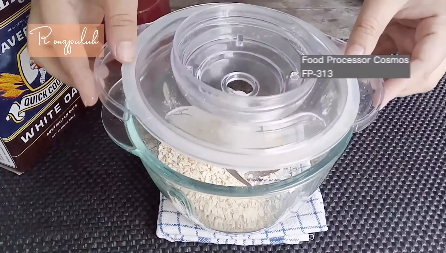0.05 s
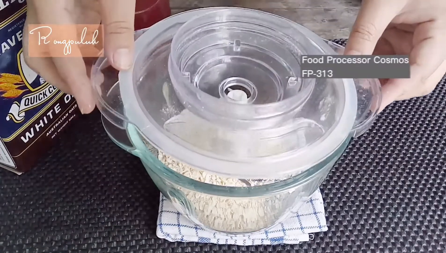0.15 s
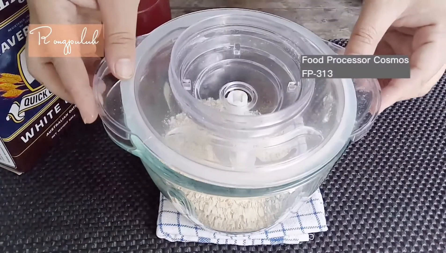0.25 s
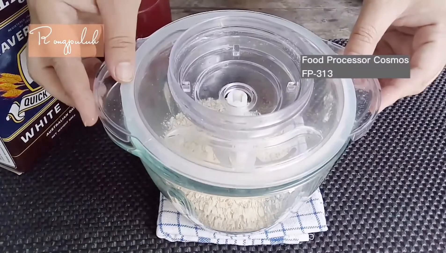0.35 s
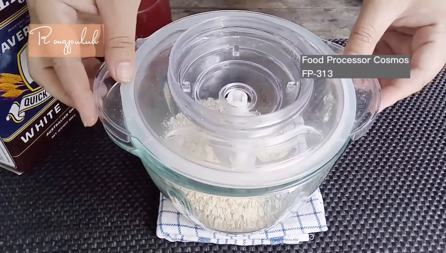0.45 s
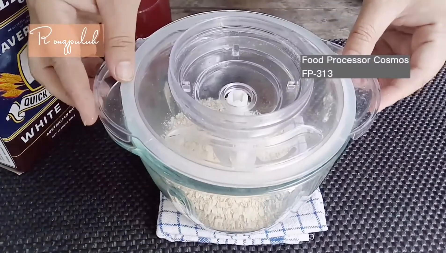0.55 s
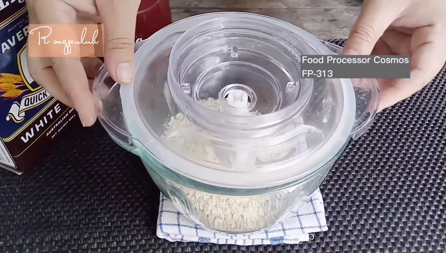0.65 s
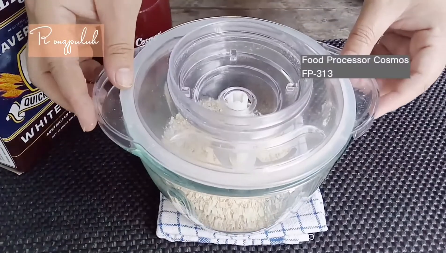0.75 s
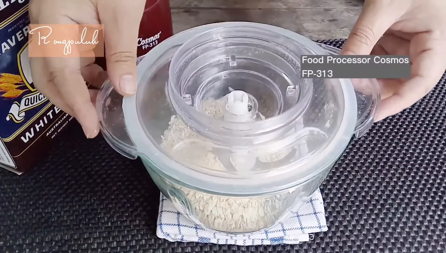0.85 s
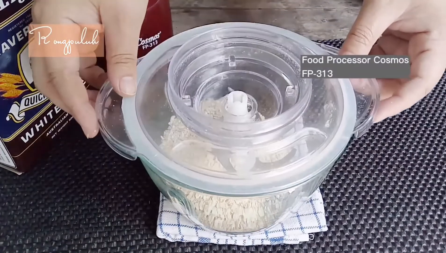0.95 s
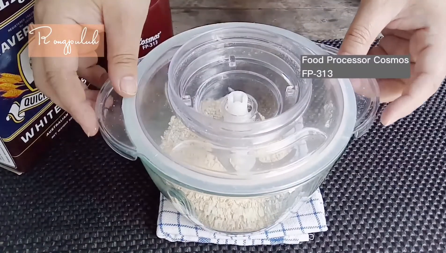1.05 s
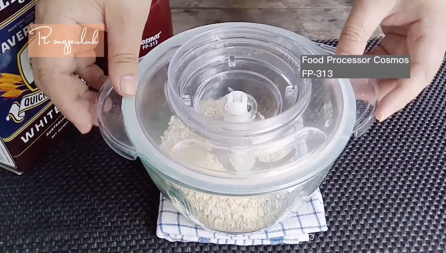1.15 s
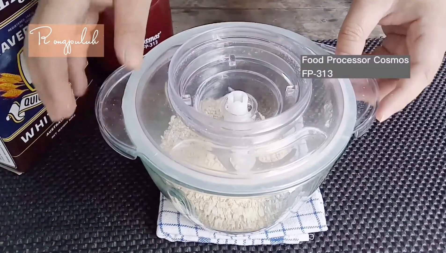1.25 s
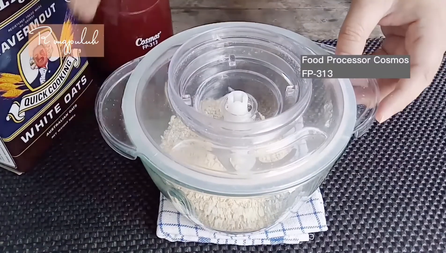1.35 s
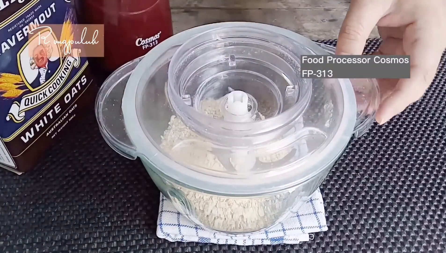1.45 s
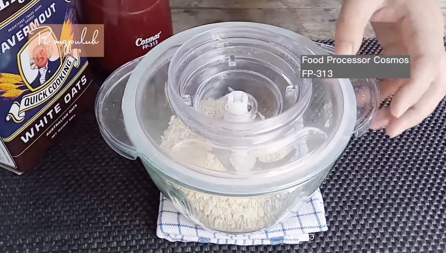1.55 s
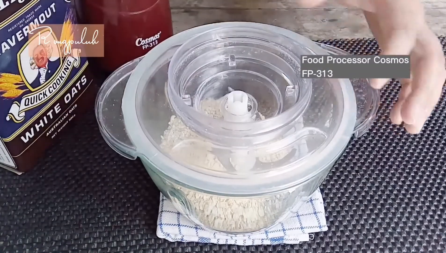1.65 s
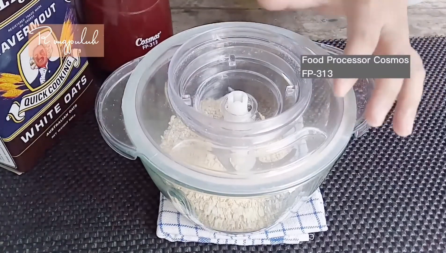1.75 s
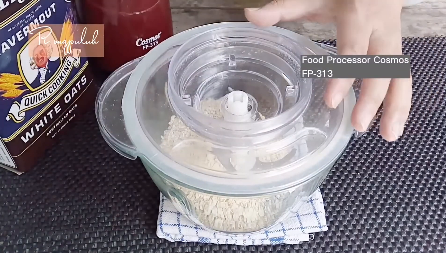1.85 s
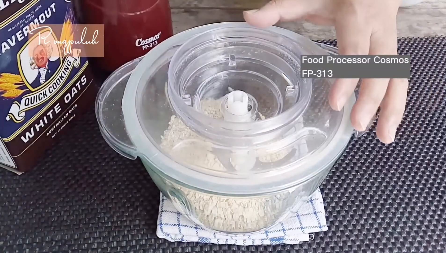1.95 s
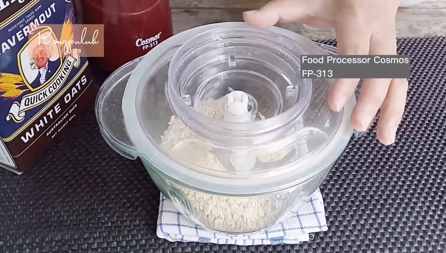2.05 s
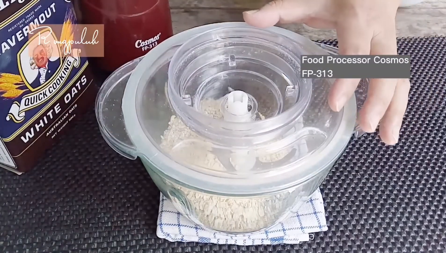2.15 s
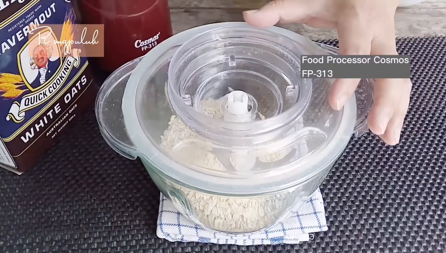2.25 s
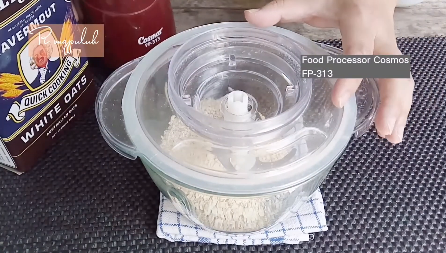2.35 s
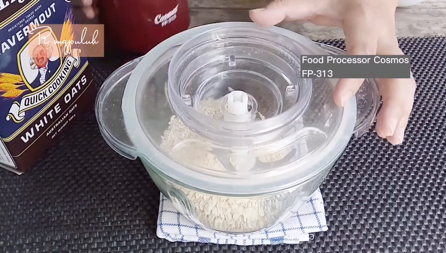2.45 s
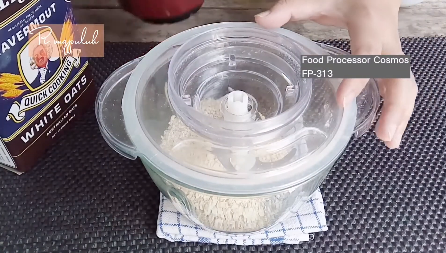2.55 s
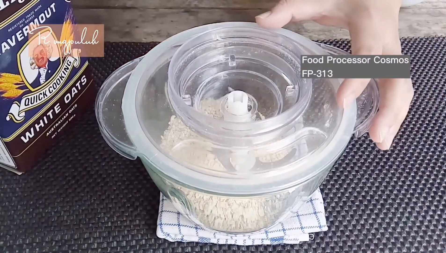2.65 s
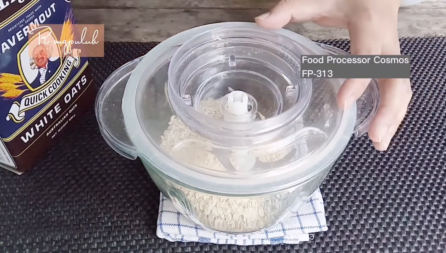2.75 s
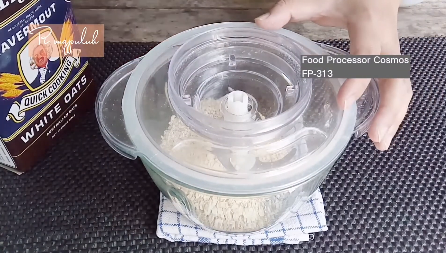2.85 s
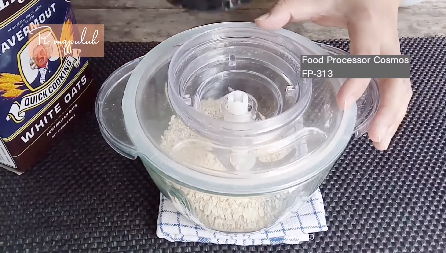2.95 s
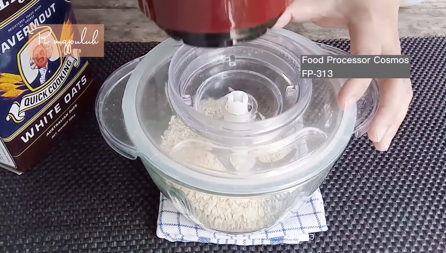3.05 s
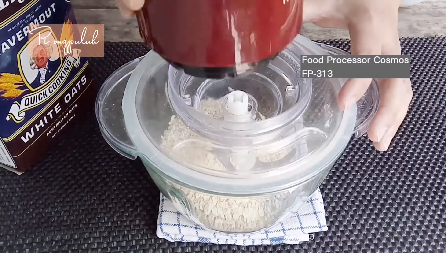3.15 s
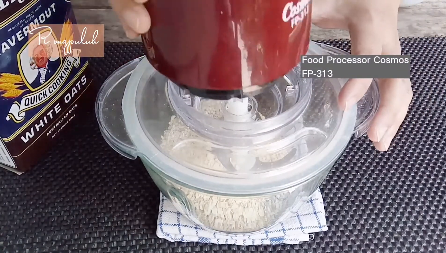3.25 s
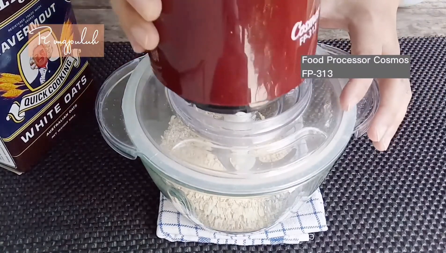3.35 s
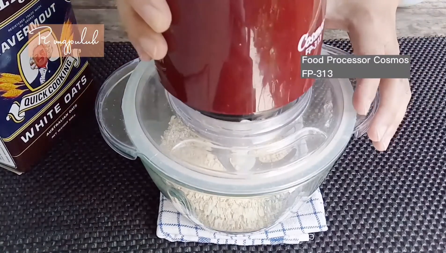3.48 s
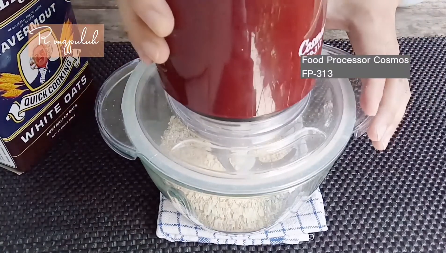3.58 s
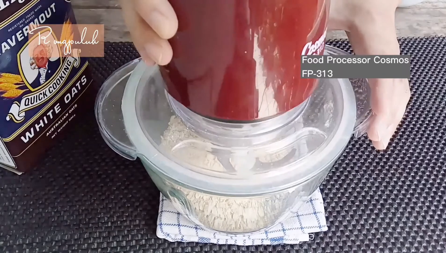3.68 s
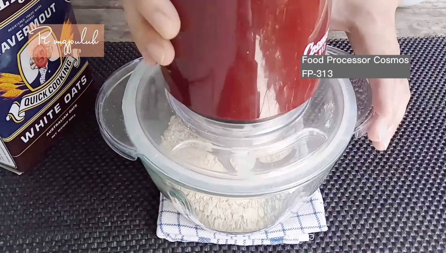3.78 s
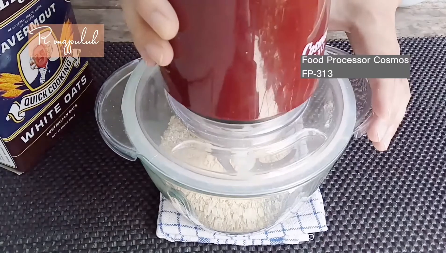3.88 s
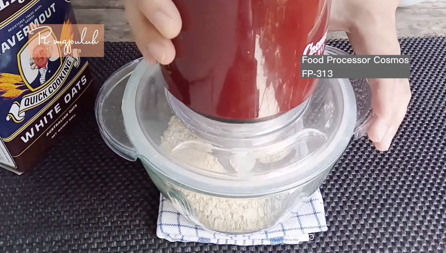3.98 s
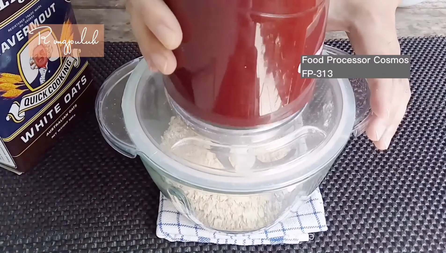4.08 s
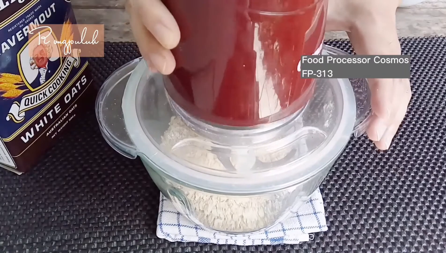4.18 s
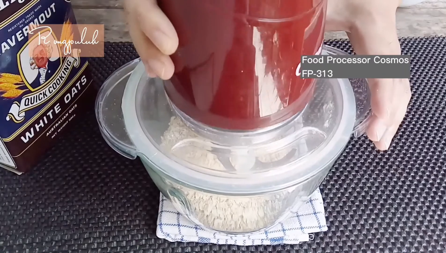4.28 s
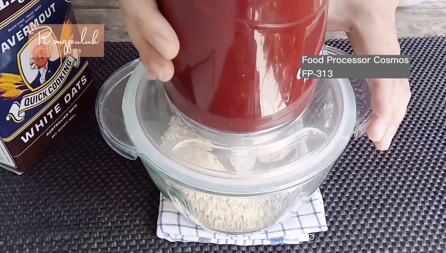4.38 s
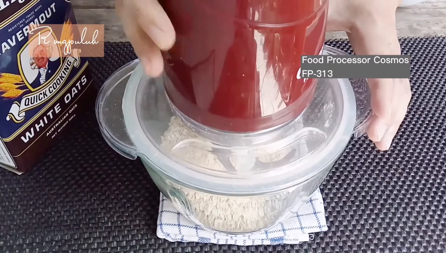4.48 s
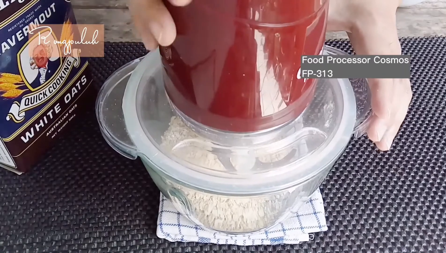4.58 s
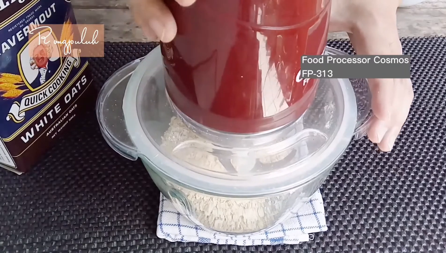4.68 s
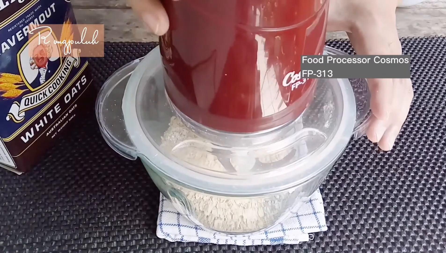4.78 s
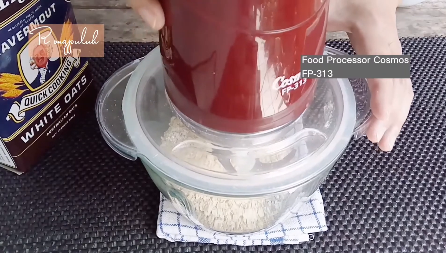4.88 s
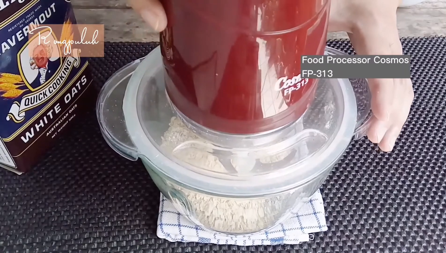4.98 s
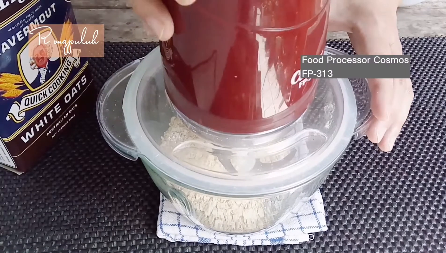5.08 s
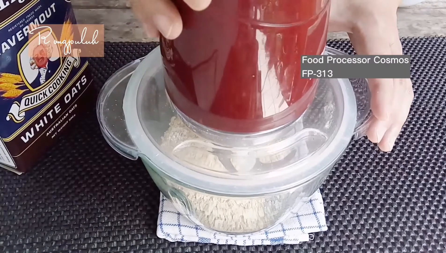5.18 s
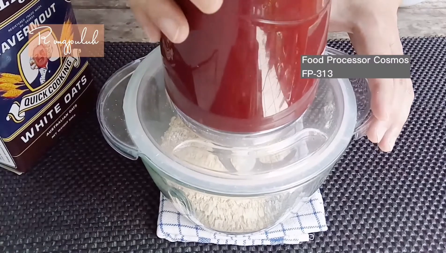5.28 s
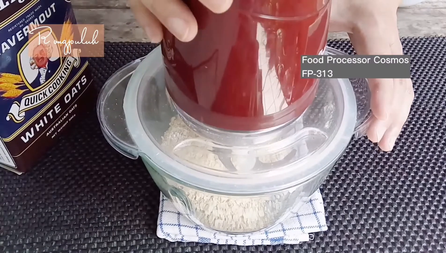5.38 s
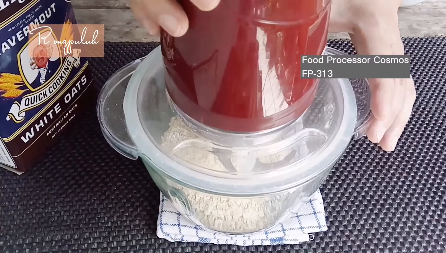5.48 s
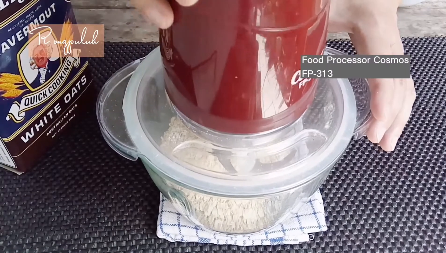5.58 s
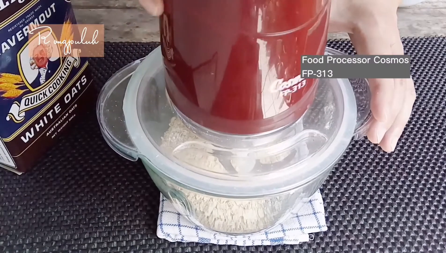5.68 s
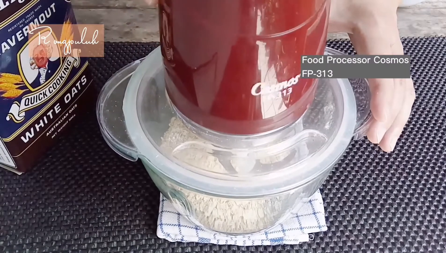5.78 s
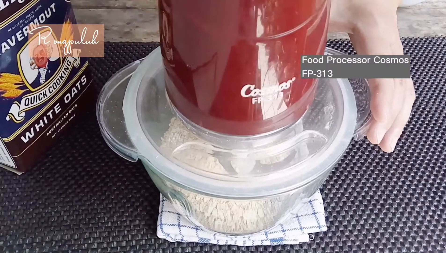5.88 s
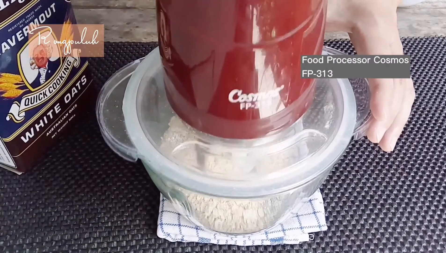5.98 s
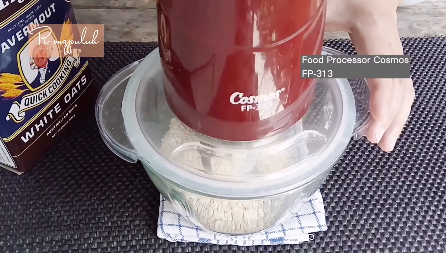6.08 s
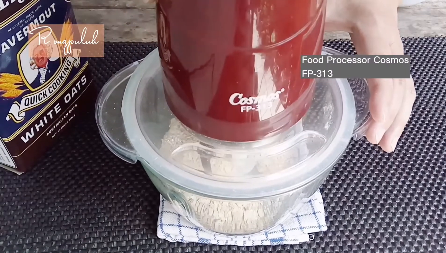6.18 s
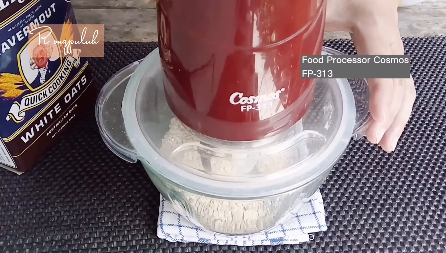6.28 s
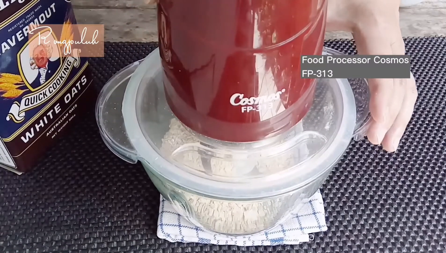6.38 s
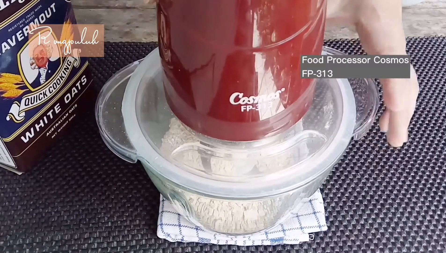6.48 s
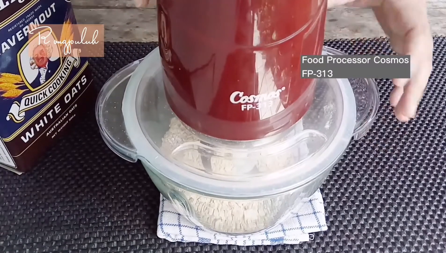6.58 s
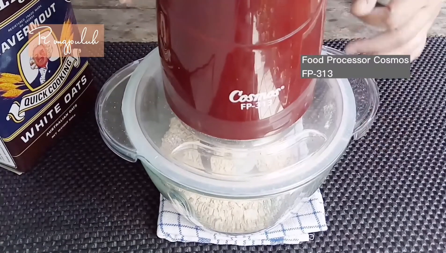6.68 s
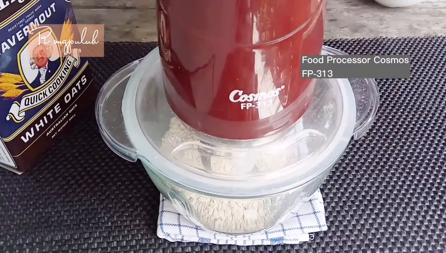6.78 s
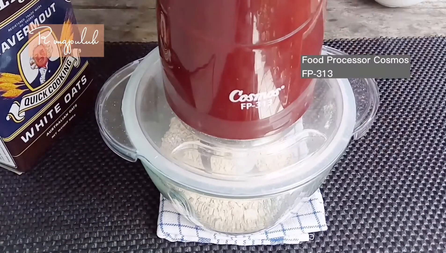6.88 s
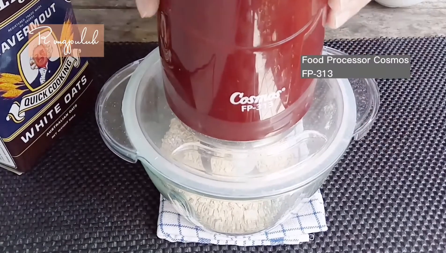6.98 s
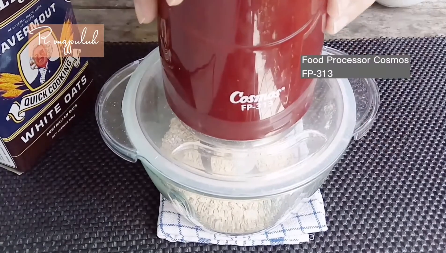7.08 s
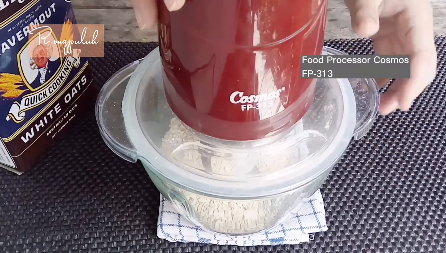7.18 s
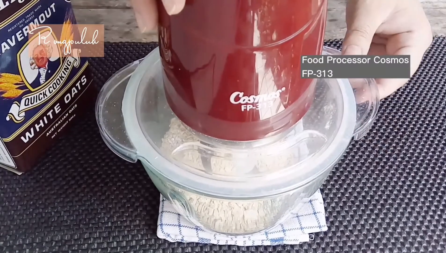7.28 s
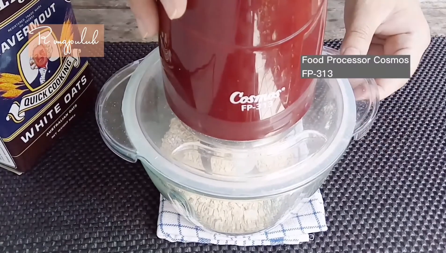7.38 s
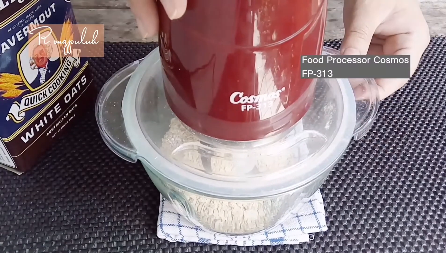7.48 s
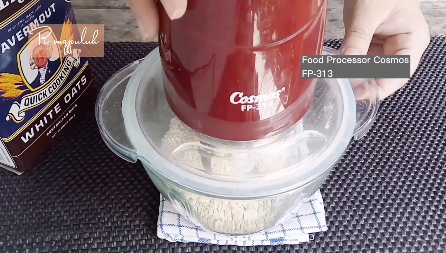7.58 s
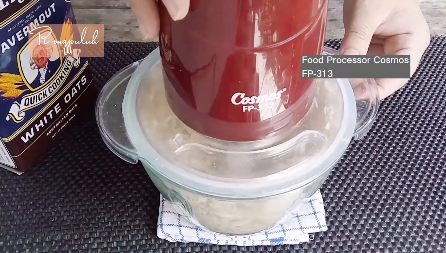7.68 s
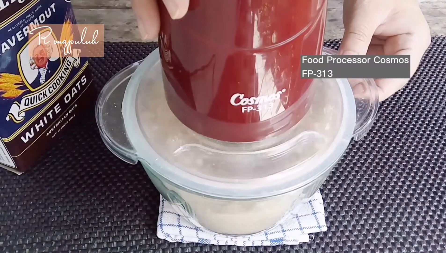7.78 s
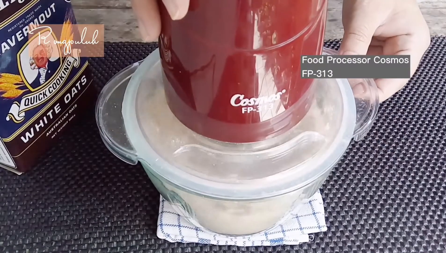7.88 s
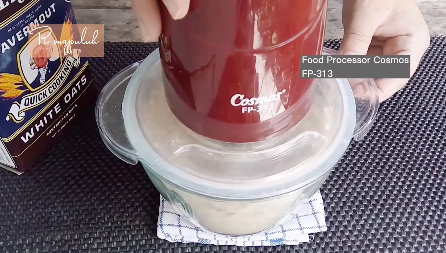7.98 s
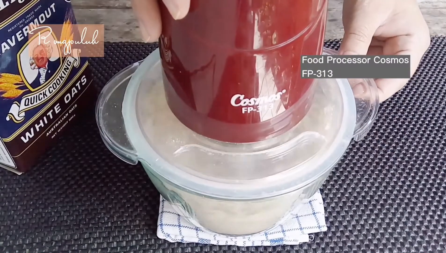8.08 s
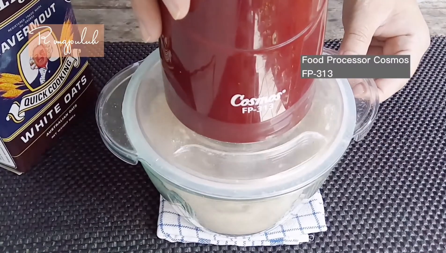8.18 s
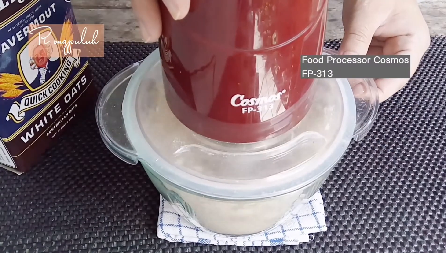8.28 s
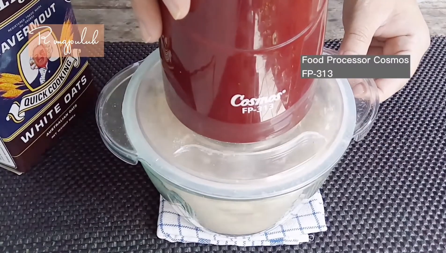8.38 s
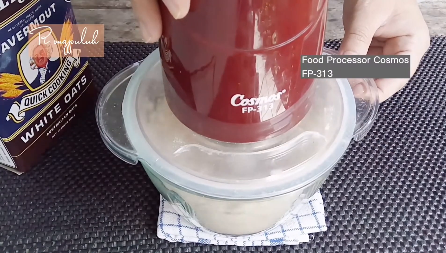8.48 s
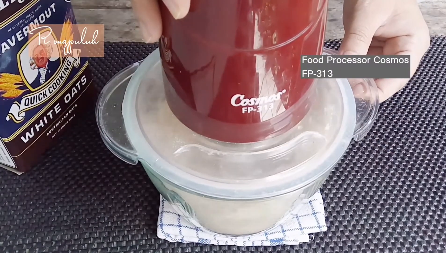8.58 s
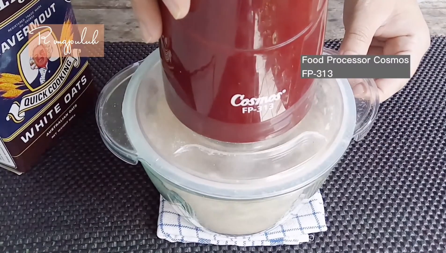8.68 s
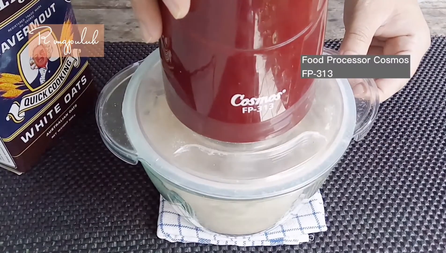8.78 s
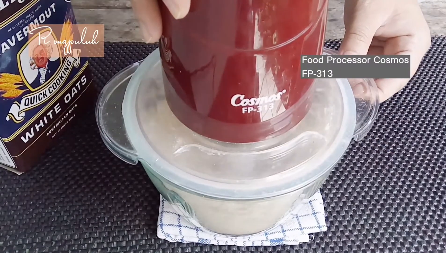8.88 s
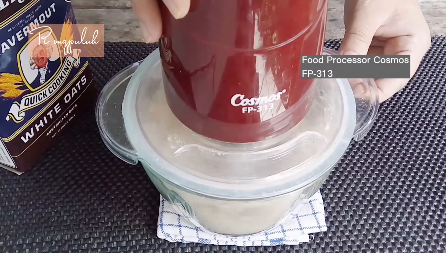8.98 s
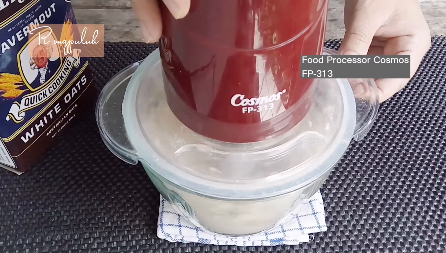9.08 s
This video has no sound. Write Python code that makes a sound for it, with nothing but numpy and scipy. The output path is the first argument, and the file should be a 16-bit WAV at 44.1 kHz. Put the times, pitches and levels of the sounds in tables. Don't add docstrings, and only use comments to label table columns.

```python
import sys
import numpy as np
from scipy import signal
from scipy.fft import rfft, irfft
from scipy.io import wavfile

SR = 44100
rng = np.random.default_rng(int(sys.argv[2]) if len(sys.argv) > 2 else 0)


def volts_from_db(level):
    exponent = np.asarray(level, float) / 20
    return 10 ** exponent


def wav_out(sig):
    wavfile.write(sys.argv[1], SR, np.round(np.clip(np.atleast_2d(sig).T, -1, 1) * 32767).astype(np.int16))


N = 403074
T = np.arange(N) / SR
HZ = np.maximum(np.fft.rfftfreq(N, 1 / SR), 1)
SIDES = np.array([[.5], [-.5]])
SCENE_ENDS_S, NEXT_SCENE_S = 6.834, 6.893
SWITCH_S, START_S = 7.8, 7.82
BODY_HZ = 198.3


def over_hz(table):
    hz, value = np.transpose(table)
    return np.interp(np.log(HZ), np.log(hz), value)


def over_time(table, fade=0.0041):
    s, *columns = np.transpose(table)
    gate = np.clip(np.minimum(T - s[0], s[-1] + fade - T) / fade, 0, 1)
    return [np.interp(T, s, c) for c in columns] + [gate]


def since(s):
    return np.maximum(T - s, 0), T >= s


def bursts(rows, rest_db, rise_s):
    power = volts_from_db(2 * rest_db) + 0 * T
    for s, db, fade in rows:
        after, on = since(s - rise_s)
        rise = np.minimum(after / rise_s, 1)
        power = power + on * volts_from_db(2 * db) * rise * np.exp(-2 * np.maximum(after - rise_s, 0) / fade)
    return 10 * np.log10(power)


def colour(x, gain, lo_hz, hi_hz):
    band = (HZ > lo_hz) & (HZ < hi_hz)
    return irfft(rfft(x) * gain / np.sqrt(np.sum(gain[..., band] ** 2) / gain.size), N)


def hump_noise(hz, width, lo_hz, hi_hz):
    gain = np.exp(-(np.log(HZ / hz) / width) ** 2)
    return colour(rng.standard_normal((2, N)), gain, lo_hz, hi_hz)


def walk(rate, channels=1):
    x = irfft(rfft(rng.standard_normal((channels, N))) * np.exp(-(HZ / rate) ** 2), N)
    return x / x.std()


def pair(alike):
    mid, side = rfft(rng.standard_normal((2, N)))
    alike = np.clip(alike, 0, 1)
    return irfft(np.sqrt((1 + alike) / 2) * mid + np.sqrt((1 - alike) / 2) * side * 2 * SIDES, N)


def ring(t, hz, t60):
    return np.sin(2 * np.pi * hz * t) * np.exp(-np.log(1000) * t / t60)


def whine(hz, db, width_hz, rough, lag=0.):
    turn = np.exp(2j * np.pi * np.cumsum(hz) / SR + 1j * lag * SIDES)
    rough = np.clip(rough, 0, 1)
    wander = (walk(width_hz, channels=2) + 1j * walk(width_hz, channels=2)) * np.sqrt(rough / 2)
    return np.sqrt(2) * volts_from_db(db) * np.real(turn * (np.sqrt(1 - rough) + wander))


# (frequency [Hz], likeness [-1 to 1])
AIR_ALIKE = [(60, 0.98), (130, 1), (290, 0.64), (640, 0.25), (1410, -0.23), (3100, 0), (6820, 0.14),
             (15000, 0.0)]
# (frequency [Hz], left minus right [dB])
AIR_PAN = [(60, 15), (110, -1), (200, 4.5), (380, 0), (700, -0.5), (1290, 0.5), (2380, 1.5), (4400, 2),
           (8120, 5), (15000, -4)]


def hum_and_hiss(spectrum, low_db, high_db, flicker_db):
    gain = volts_from_db(over_hz(spectrum) + over_hz(AIR_PAN) * SIDES)
    noise = pair(over_hz(AIR_ALIKE))
    bass = 1 / (1 + (HZ / 500) ** 2)
    low = colour(noise, gain * bass, 80, 410) * volts_from_db(low_db + flicker_db * walk(8.1))
    high = colour(noise, gain * (1 - bass), 1030, 18000)
    return low + high * volts_from_db(high_db + 0.25 * flicker_db * walk(33))


# (frequency [Hz], density [dB per Hz])
AIR = [(15, -45), (25, 4), (49, -15.5), (113, -4), (160, -2.5), (198, -12), (331, -17), (445, -21),
       (537, -19), (1300, -29), (1800, -29.5), (2700, -32), (10100, -36), (13900, -46), (15500, -76)]
# (time [s], level over the still room [dB])
STIR = [
    (0, 0),
    (.4, 2),
    (1.0, -1),
    (2.0, 0.5),
    (4.1, 1.5),
    (4.45, 2.5),
    (5.9, 4),
    (6.3, 4.5),
    (6.45, 0.5),
    (6.84, 3),
]


def kitchen():
    stir_db, _ = over_time(STIR)
    booms = []
    for s, _, boom_db, *_ in HEAD:
        booms += [(s, boom_db - 20, 0.04), (s, boom_db - 41, 0.68)]
    low_db = bursts(booms, -47.5 + 0.41 * stir_db, rise_s=0.021)
    high_db = -55.5 + stir_db
    return hum_and_hiss(AIR, low_db - 0.5, high_db + 3, 3.24) * (T < NEXT_SCENE_S)


# (frequency [Hz], level [dB], t60 [s])
TABLE_TOP = [(91.5, -26, 0.18), (125.5, -6, 0.35), (175, 16, 0.13), (314, -39, 2.9)]


def table_boom(t):
    push = np.hanning(int(0.008 * SR))
    modes = sum(volts_from_db(db) * ring(t, hz, t60) for hz, db, t60 in TABLE_TOP)
    boom = np.convolve(modes, push)[:len(t)]
    return -boom / np.abs(boom).max()


# (frequency [Hz], density [dB per Hz])
CRACK = [(710, -29), (1200, 1.5), (2380, -11), (3140, -3), (3810, -6.5), (5490, -6), (8420, -7),
         (10100, -11), (15500, -28)]


def strike(rows, modes):
    out, t = np.zeros((2, N + SR)), np.arange(SR // 2) / SR
    snap = colour(rng.standard_normal((2, N)), volts_from_db(over_hz(CRACK)), 1130, 12000)
    rattle = hump_noise(550, 0.67, 200, 1800)
    clack = hump_noise(2800, 0.88, 1500, 6000)
    spot = rng.standard_normal((len(rows), len(modes), 2))
    boom = table_boom(t)
    for (s, crack_db, boom_db, body_db, body_hz, ring_db), chance in zip(rows, spot):
        i = int(s * SR)
        piece = slice(i // 2, i // 2 + len(t))
        tail = (1 - np.exp(-t / 0.00017)) * (np.exp(-t / 0.0025) + volts_from_db(-16.5) * np.exp(-t / 0.014))
        crack = volts_from_db(crack_db - 6.5) * tail * snap[:, piece]
        rim = volts_from_db(-9.5) * np.exp(-t / 0.0071) * clack[:, piece]
        for (hz, db, t60), (louder, higher) in zip(modes, chance):
            rim = rim + volts_from_db(db + 1.6 * louder) * ring(t, hz * (1 + 0.035 * higher), t60)
        body = ring(t, body_hz, 0.063) + volts_from_db(-11.0) * ring(t, 424.0, 0.038)
        body = body + volts_from_db(-16.5) * np.exp(-t / 0.011) * rattle[:, piece]
        body = body * (1 - np.exp(-t * body_hz / 0.31))
        near = crack + volts_from_db(body_db + 5.5) * body + volts_from_db(ring_db - 3.5) * rim
        out[:, i:i + len(t)] += near * volts_from_db(4.2 * SIDES) + volts_from_db(boom_db + 1 + 1.2 * SIDES) * boom
    return out[:, :N]


# (frequency [Hz], level [dB], t60 [s])
RIM = [(720, -6, 0.026), (1030, 1.5, 0.017), (1525, 2, .03), (2230, -18, 0.03)]
# (time [s], crack peak [dB], body level [dB], body frequency [Hz], rim level [dB])
TAPS = [(0.3037, -49, -41, 525, -27), (0.3326, -28, -43, 430, -33), (0.35, -29, -33, 510, -36),
        (0.3546, -35, -28, 524, -37), (0.3972, -31, -33, 490, -36), (0.5238, -14.5, -33, 400, -30),
        (0.5552, -41, -37, 259, -52), (0.902, -52, -34, 364, -57), (1.0757, -38, -30.5, 228, -47),
        (1.0834, -51, -30, 188, -55), (1.4276, -30.5, -50, 247, -33.5), (1.0745, -60, -43.5, 1024, -60)]


def lid_taps():
    rows = []
    for s, crack_db, body_db, hz, rim_db in TAPS:
        boom_db = body_db + 7.5 - 9.5 * np.log2(hz / BODY_HZ)
        rows.append((s, crack_db, boom_db, body_db, hz, rim_db))
    return strike(rows, RIM)


# (time [s], peak level [dB], frequency [Hz], relative width [log ratio], length [s])
SCUFFS = [
    (1.36, -51.5, 4170, 0.26, 0.086),
    (1.358, -44.5, 2470, 0.067, 0.028),
    (3.527, -49.5, 3900, 0.25, 0.11),
    (3.54, -46.5, 2500, 0.13, 0.044),
    (4.676, -47.5, 8400, 0.6, 0.03),
    (5.58, -51.5, 440, 0.39, 0.51),
    (5.81, -52.5, 5600, 0.48, 0.27),
    (6.64, -47, 5190, 0.073, 0.1),
    (6.72, -54, 5150, 0.04, 0.15),
    (3.45, -60, 3800, 0.25, 0.087),
]


def scuffs():
    out = 0
    for s, db, hz, width, length in SCUFFS:
        swell = np.exp(-(2 * (T - s) / length) ** 2)
        out = out + volts_from_db(db + 3.2 * walk(55)) * swell * hump_noise(hz, width, 100, 16000)
    return out * (T < NEXT_SCENE_S)


# (frequency [Hz], level [dB], t60 [s])
SEAT = [(914, -6, 0.02), (1160, -1, 0.034), (1650, -4.5, 0.017), (2530, -13, 0.028)]
# (time [s], crack peak [dB], table boom [dB], body level [dB], rim level [dB])
HEAD = [(2.791, -38, -27, -32, -41), (3.6547, -38, -24.5, -27, -58), (3.7581, -36.5, -22, -21.5, -37),
        (3.895, -51, -27, -21.5, -60), (3.9179, -34, -19, -24, -28.5), (4.2411, -28, -25, -29, -63),
        (4.2546, -25, -23, -22.5, -45), (4.2649, -25, -19.5, -30, -36), (4.2802, -20, -11, -31, -8.5),
        (4.2837, -7, -24, -5, -16.5), (4.296, -31, -15, -11, -42), (4.344, -29, -18, -28.5, -50),
        (4.5225, -42, -33, -23.5, -46), (4.5385, -25, -21, -25, -35), (5.2146, -30.5, -28.5, -32.5, -43),
        (5.8994, -41, -32, -55, -53), (6.1768, -15.5, -33, -26, -24), (6.1831, -9.5, -9, -14.5, -33),
        (6.1915, -20, -5.5, -12.5, -22), (6.2005, 0, -33, -32, -36), (6.2095, -4.5, -14, -21, -18),
        (6.2149, -3, -9, -10.5, -4.5), (6.2213, -17, -5, -9.5, -17)]


def motor_head():
    rows = [(s, crack, boom, body, BODY_HZ, rim) for s, crack, boom, body, rim in HEAD]
    return strike(rows, SEAT)


# (frequency [Hz], level [dB], t60 [s])
LIFT = [(213, 7.5, 1.76), (312, -6.5, 4.1), (363, 5.5, 0.72), (487, -3, .7), (600, -13, 2.7)]


def head_lift():
    after, _ = since(2.8)
    modes = sum(volts_from_db(db) * ring(after, hz, t60) for hz, db, t60 in LIFT)
    return volts_from_db(-44.5 + 2.2 * walk(22, channels=2)) * (1 - np.exp(-after / 0.0029)) * modes


# (frequency [Hz], density [dB per Hz])
RUSTLE = [(120, -19), (200, -2.5), (339, -17.5), (488, -9.5), (665, -21.5), (1350, -26.5), (2330, -26.5),
          (2750, -26.5), (6350, -31), (8200, -28), (11200, -30), (15500, -35.5)]
# (time [s], level [dB])
PRESS = [(6.89, -36), (6.96, -33), (7.0, -38), (7.12, -31), (7.165, -46), (7.19, -32), (7.25, -36.5),
         (7.38, -32), (7.458, -44), (7.494, -32.5), (7.73, -32.5), (7.8, -36.5), (7.86, -38)]
# (time [s], rustle level [dB], table boom [dB], fade [s])
SLIPS = [(6.946, -42.5, -31, 0.029), (7.049, -50.5, -27, .025), (7.1196, -52, -26, 0.017),
         (7.1843, -46, -38, 0.069), (7.3, -48.5, -44, .015), (7.344, -46, -34, 0.096),
         (7.484, -47.5, -42, .05), (7.5242, -50, -31, 0.027), (7.5542, -47, -36, .015),
         (7.597, -44, -27, 0.095), (7.6954, -48, -31, 0.021), (7.732, -46.5, -23, 0.14),
         (7.806, -40.5, -44, .04)]


def fingers():
    low_db, gate = over_time(PRESS)
    high_db = bursts([(s, db, fade) for s, db, _, fade in SLIPS], rest_db=-54.5, rise_s=0.0069)
    rocking = whine(142 + 9 * walk(6.0)[0], low_db + 1.5 * SIDES, 25, 0.16)
    skin = hump_noise(11000, 0.37, 1500, 16000) * volts_from_db(high_db - 14.0 + 5.0 * walk(21))
    rustle = hum_and_hiss(RUSTLE, low_db - 9.5, high_db + 4.5, 4.4)
    ticks = [(s, db - 5, boom_db, -40.5, BODY_HZ, db - 17) for s, db, boom_db, _ in SLIPS]
    return gate * (rocking + rustle + skin) + strike(ticks, SEAT)


def shaft_hum(hz):
    short_db = 0.36 * np.minimum(hz - 322, 0)
    hum = whine(hz, -23.5 + short_db + 5.7 * SIDES, 17, 0.013)
    return hum + whine(2 * hz, -38 + 0.18 * short_db - 1.8 * SIDES, 30, 0.26, lag=1.3)


def rumble(db):
    gain = sum(1 / (1 + (2 * (HZ - hz) / width) ** 2) for hz, width in ((135, 34), (180, 37)))
    return colour(pair(0.8 + 0 * HZ), gain, 90, 240) * volts_from_db(db)


def gear_whine(hz, run):
    mesh_hz = 8.7 * hz
    bite_db = 100 * np.log10(hz / 330)
    fine = 1 / (1 + np.exp(-(T - 8.24) / 0.039))
    mesh_db = -16 - 4.5 * fine - 5 * run
    mesh = whine(mesh_hz, mesh_db - 4.5 + bite_db + 2.8 * SIDES, 110, .4, lag=1.38)
    lower_hz = np.minimum(2.03 * mesh_hz, 5670)
    lower = whine(lower_hz, -22 - 5.5 + 0.79 * bite_db + 7.6 * SIDES, 200, 0.95)
    upper_hz = 6210 + 5.5 * (hz - 347)
    upper = whine(upper_hz, -19 - 3 + 4.5 * (run - 1) + 9.4 * SIDES, 190, 1)
    return mesh + (1 - 0.66 * fine) * lower + (0.27 * (T >= START_S) + 0.68 * fine) * upper


# (frequency [Hz], density [dB per Hz])
GRIND = [(150, -54), (250, -17), (450, -15.5), (600, -22), (880, -24), (1230, -19.5), (2270, -22),
         (3000, -14.5), (4600, -20), (6300, -15), (8200, -16), (10500, -22), (14300, -31.5), (14600, -68)]
# (frequency [Hz], left minus right [dB])
GRIND_PAN = [(60, -2), (110, 10), (200, 2), (380, 5.5), (700, -1.0), (1290, 4.5), (2380, 0), (4400, 7),
             (8120, 7.0), (15000, -2)]
# (frequency [Hz], width [Hz], level over grinding [dB])
BOWL = [(1215, 194, 6), (4980, 560, -4), (5420, 200, -8.5)]


def oats():
    biting, _ = since(START_S)
    db = -29.5 - 6 * np.exp(-biting / .12) + 1.5 * np.exp(-biting / 0.016)
    hits = rng.random((2, N)) < .08
    flakes = hits * volts_from_db(3.2 * rng.exponential(size=(2, N))) * rng.standard_normal((2, N))
    rush = pair(0.48 / (1 + (HZ / 500) ** 2)) + .5 * flakes / flakes.std()
    body = 1 + sum(volts_from_db(top_db) / (1 + (2 * (HZ - hz) / width) ** 2) for hz, width, top_db in BOWL)
    gain = volts_from_db(over_hz(GRIND)) * body * volts_from_db(over_hz(GRIND_PAN) * SIDES)
    rattling = colour(rush / rush.std(), gain, 840, 2350) * volts_from_db(db + 4.0 + 0.69 * walk(48))
    return np.clip((T - START_S) / 0.01 + 1, 0, 1) * rattling


# (frequency [Hz], level [dB], t60 [s])
DRIVE = [(1100, -18, .015), (1223, 2.5, 0.035), (1400, -10, .015), (2300, -18, .015)]
# (time [s], crack peak [dB], coupling level [dB])
JOLTS = [
    (7.8169, -13, -14.5),
    (7.839, -21, -26),
]


def drive_jolts():
    return strike([(s, crack, -32, -30, BODY_HZ, level) for s, crack, level in JOLTS], DRIVE)


# (time [s], frequency [Hz], level [dB])
CASING = [(7.94, 423, -57), (7.982, 420, -24.5), (8.336, 449.6, -31.5), (8.676, 444.6, -34.5),
          (8.72, 450, -50)]
# (time [s], frequency [Hz], level [dB])
COVER = [(7.96, 3380, -63), (8.012, 3290, -29), (8.376, 3390, -56), (8.4, 3269, -55)]


def casing_tones():
    out = 0
    for table, pan_db in ((CASING, 3.0), (COVER, 4.0)):
        hz, db, shaken = over_time(table, fade=0.052)
        out = out + shaken * whine(hz, db + pan_db * SIDES, 34, 0.053, lag=0.29)
    return out


def motor():
    run, on = since(SWITCH_S)
    hz = 330 + 26.5 * run - 185 * np.exp(-run / .072)
    turning = on * (shaft_hum(hz) + rumble(-27 - 7 * run) + gear_whine(hz, run))
    return turning + drive_jolts() + oats() + casing_tones()


def scene():
    return kitchen() + lid_taps() + scuffs() + motor_head() + head_lift() + fingers() + motor()


def roll_off(x):
    return signal.sosfilt(signal.butter(12, 15850, fs=SR, output="sos"), x)


def record(dry):
    port_db = -7.5 * np.exp(-((HZ - 8160) / 1170) ** 2)
    heard = irfft(rfft(dry) * volts_from_db(port_db) * (HZ < 15600), N)
    bass_cut = signal.butter(4, 96.7, "high", fs=SR, output="sos")
    heard = 0.93 * signal.sosfilt(bass_cut, heard) + 0.055 * heard
    on = np.clip(np.maximum(SCENE_ENDS_S - T, T - NEXT_SCENE_S) / 0.00062, 0, 1)
    drive = .9
    return roll_off(np.tanh(drive * heard * on) / drive)


dry = scene()
out = record(dry)
wav_out(out)
```